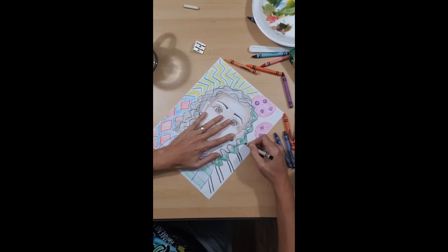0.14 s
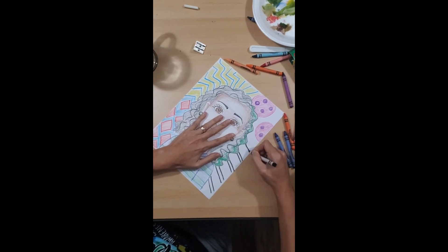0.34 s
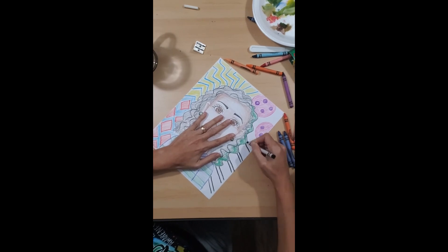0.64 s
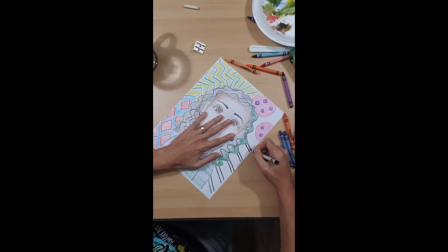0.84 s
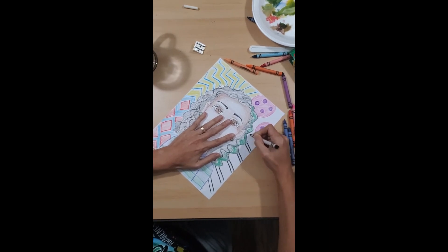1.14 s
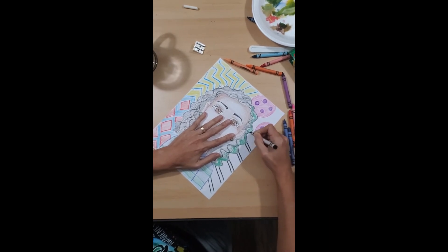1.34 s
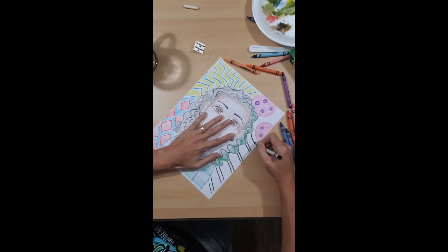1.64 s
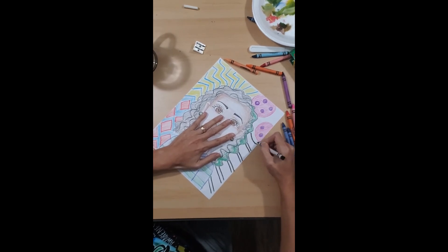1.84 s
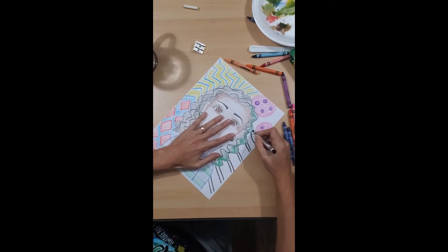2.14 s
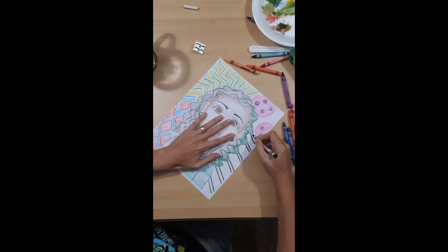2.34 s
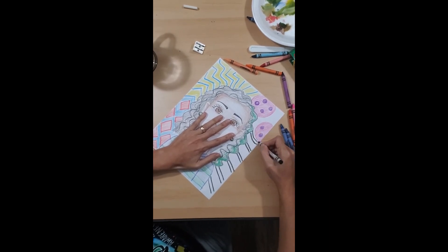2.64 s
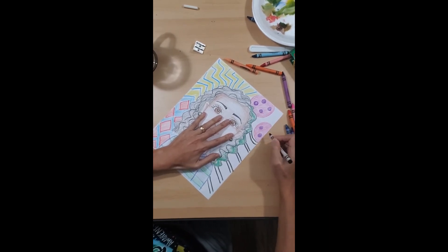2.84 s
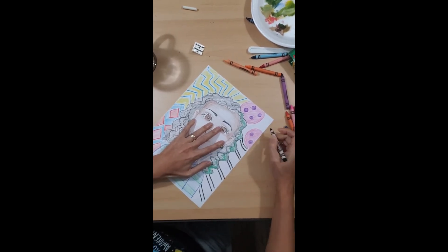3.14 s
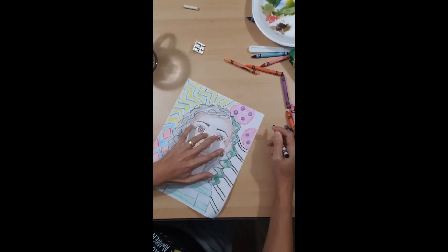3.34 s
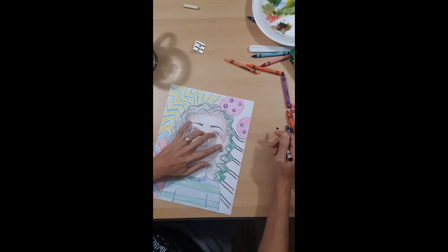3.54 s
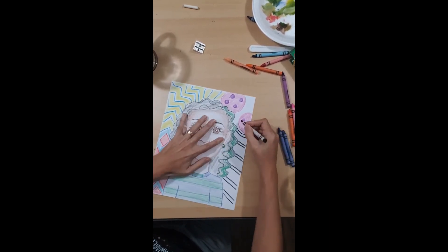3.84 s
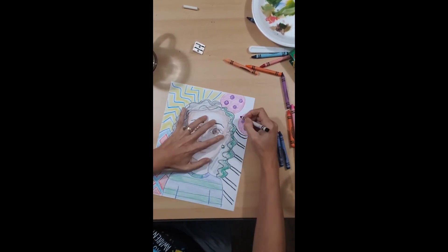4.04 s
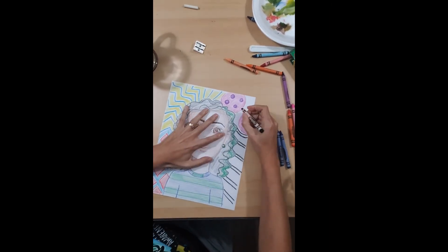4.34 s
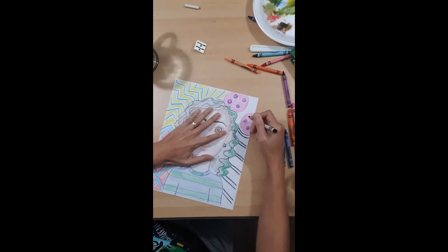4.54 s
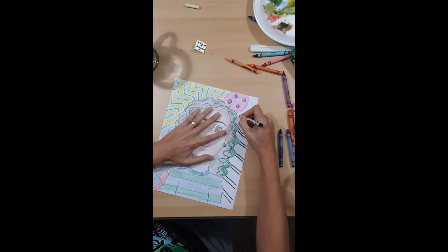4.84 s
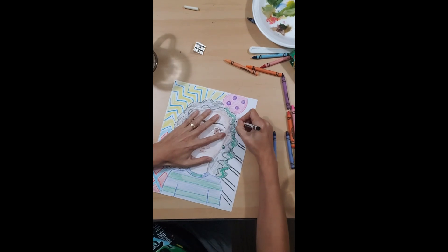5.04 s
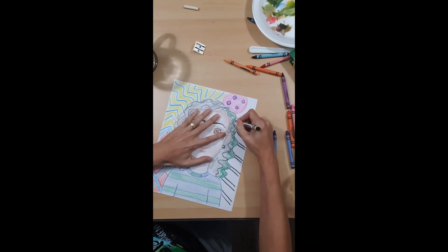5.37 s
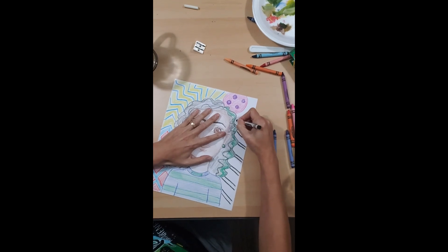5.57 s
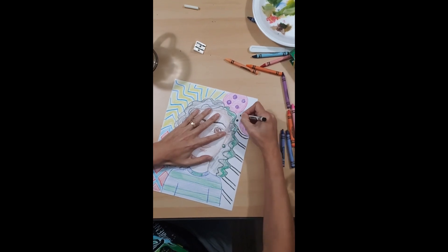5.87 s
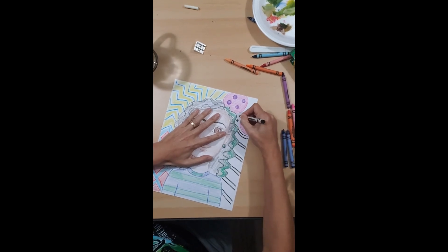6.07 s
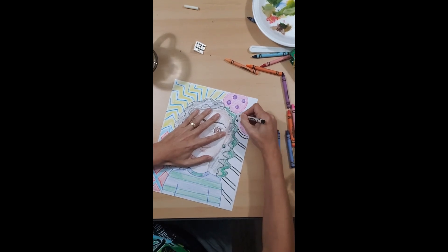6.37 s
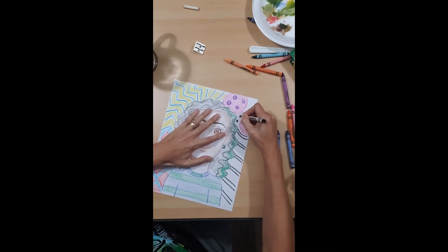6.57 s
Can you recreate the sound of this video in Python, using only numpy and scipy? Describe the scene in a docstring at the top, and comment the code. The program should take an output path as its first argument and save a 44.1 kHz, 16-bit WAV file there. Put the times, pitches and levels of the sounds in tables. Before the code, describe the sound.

A wax crayon scuffs and ticks on paper over a wooden table, the sheet swishing and a hand thumping, above a low steady hum.

```python
"""In a small quiet room with a low hum, someone colours with a wax crayon on paper at a wooden table.
The crayon rubs and scuffs as shaped grainy noise; hands and sheet slide as a hiss that darkens in each swish.
Knocks and hand thumps ring the decaying modes of the table top; crayons click as a crack with a brief ring.
One judder is a train of uneven noise bursts. Tones and shaped noise make the hum, rumble and air."""
import sys
import numpy as np
from scipy import signal
from scipy.fft import rfft, irfft, next_fast_len
from scipy.io import wavfile
from scipy.ndimage import map_coordinates

SR = 44100
rng = np.random.default_rng(int(sys.argv[2]) if len(sys.argv) > 2 else 0)


def generate_wav(signal):
    """Clip the signal to [-1, 1] and save it as 16-bit WAV at the path in sys.argv[1]."""
    frames = np.transpose(np.atleast_2d(signal))
    scaled = np.clip(frames, -1, 1) * 32767
    pcm = np.round(scaled).astype(np.int16)
    wavfile.write(sys.argv[1], SR, pcm)


N = 295591  # length in samples

# Faint unsteady tones beside the hum. Each row: pitch in Hz, mean level in dB.
WHINE_TONES = [(209.9, -81), (710.6, -87), (823.6, -87)]
# A second hum tone swells, rising a little. Each row: time in seconds, pitch in Hz, level in dB.
HUM_SWELL = [(1.1, 104.2, -85), (1.6, 106, -66), (2.4, 107, -59.5), (2.9, 109.7, -58), (3.3, 113.6, -84.5)]
# Spectrum of the room's rumble. Each row: frequency in Hz, relative density in dB per Hz.
RUMBLE_SPECTRUM = [(20, -31), (45, -9), (75, -7.5), (122, 3.5), (150, -1), (190, -5), (250, -15),
                   (350, -25.5), (700, -63)]
# Spectrum of the still room's air. Each row: frequency in Hz, relative density in dB per Hz.
AIR_SPECTRUM = [(150, -26), (280, -9.5), (380, -10.5), (560, -9.5), (820, -8.5), (1050, -16.5), (1300, -11),
                (2100, -18.5), (4100, -20), (5600, -13), (7000, -15), (9300, -22), (15700, -22.5)]
# Short gritty scuffs of crayon tip and sheet. Each row: start in seconds, level in dB, pitch in Hz,
# length in seconds.
SCUFFS = [(0.058, -61, 1400, 0.028), (1.883, -51.5, 1780, 0.031), (1.96, -39.5, 1900, 0.026),
          (2.09, -59, 2090, 0.018), (2.375, -54, 480, 0.053), (2.84, -54, 2800, 0.033),
          (3.022, -42.5, 8800, .035), (3.672, -37, 1900, 0.034), (3.787, -35.5, 2050, 0.046),
          (4.219, -50, 4280, 0.11), (5.645, -60, 1622, 0.052), (5.949, -61, 1400, 0.022)]
# The crayon drags over the paper. Each row: hardest pressure in seconds, relative level in dB,
# rise in seconds, fall in seconds.
CRAYON_DRAGS = [(.06, -61.5, .2, 0.051), (.705, -70, .03, .09), (1.042, -54.5, .06, 0.13),
                (1.471, -55.5, 0.12, 0.22), (1.658, -60.5, .03, .16), (2.39, -64.5, .22, 0.16),
                (2.89, -52.5, .055, 0.12), (3.43, -71.5, 0.13, .07), (3.6, -73, .2, .2),
                (3.76, -55.5, 0.067, 0.12), (3.97, -57.5, .025, 0.14), (4.11, -61.5, .04, 0.082),
                (5.69, -75, 0.051, .12), (5.95, -67, 0.24, 0.15)]
# Spectrum of wax on paper. Each row: frequency in Hz, relative density in dB per Hz.
GRIT_SPECTRUM = [(150, -17), (400, 4.5), (800, 2.5), (1700, -3.5), (3200, -12), (6000, -15), (15000, -26)]
# Hand or sheet slides. Each row: fastest moment in seconds, relative level in dB, rise in seconds,
# fall in seconds, lower edge of the hiss in Hz at the fastest moment.
HAND_SLIDES = [(.07, -70, 0.099, 0.14, 2460), (.36, -72, 0.087, .1, 4470), (.70, -68.5, 0.043, 0.086, 3500),
               (.85, -65, .13, .12, 4740), (1.075, -56.5, 0.085, .17, 4000),
               (1.38, -52.5, 0.13, 0.28, 3500), (1.69, -71.5, .1, .15, 2200), (2.32, -66.5, 0.29, .4, 4000),
               (2.90, -56.5, .14, .19, 1900), (3.18, -55.5, 0.17, 0.21, 2000),
               (3.422, -42, 0.073, 0.057, 2200), (3.519, -50, 0.031, 0.2, 2670),
               (3.75, -57.5, .1, .08, 3500), (3.98, -59.5, 0.096, 0.23, 2400),
               (4.10, -61.5, 0.13, 0.11, 3100), (4.53, -71.5, 0.052, .06, 2000),
               (4.705, -60.5, .045, 0.19, 6100), (5.21, -68, 0.19, 0.22, 4800),
               (5.42, -73.5, 0.078, 0.12, 4300), (5.604, -50.5, 0.051, .13, 2800),
               (5.83, -67, 0.16, 0.13, 3000), (5.98, -58.5, 0.15, 0.13, 2210)]
# Spectrum of the sliding hiss. Each row: frequency in Hz, relative density in dB per Hz.
HISS_SPECTRUM = [(600, -14.5), (1300, 2), (2000, -5), (3200, -3), (4500, -1.5), (6500, -0.5), (8500, -2),
                 (12000, -2), (15000, -10), (15800, -11)]
# The crayon tip strikes the table top. Each row: start in seconds, level in dB ahead of the bass shaping, #
# upper edge of the excited range in Hz (softer contact is lower).
TIP_KNOCKS = [(0.077, -57, 1230), (.194, -62, 1050), (.700, -67.5, 1460), (1.084, -52.5, 1180),
              (1.954, -51, 2400), (2.513, -63.5, 1000), (2.890, -53, 1080), (3.0238, -31.5, 5200),
              (3.032, -35, 560), (3.130, -53.5, 1400), (3.786, -44, 1200), (4.187, -33.5, 2420),
              (6.017, -62, 900)]
# The side of the hand lands with its weight and heaves the whole top. Each row: start in seconds, # level in dB
# ahead of the bass shaping, lower and upper edge of the excited range in Hz.
HAND_THUMPS = [(3.025, -38, 143, 170), (4.188, -38.5, 145, 171), (4.241, -29.5, 196, 800),
               (4.253, -23.5, 202, 620), (4.268, -31.5, 90, 113), (4.281, -32.5, 210, 1200)]
# Single modes of the table top. Each row: pitch in Hz, relative level in dB, 60 dB decay in seconds.
TABLE_MODES = [(114.27, 0.5, 0.44), (153, 5.5, 0.14), (212.5, -4.5, .3), (230, 2, 0.17), (274.2, -8, 0.36),
               (408.8, 2, 0.11), (425, -7.5, .25), (473, 0, 0.07), (553, -8, 0.28), (660, -1.5, 0.073),
               (702.4, -4.5, 0.34), (798, 2, 0.13), (830.4, 0, 0.12), (911, -12.5, 0.17), (1030, -33, 0.12),
               (1067, -21.5, 0.14), (1227, 3, 0.19), (1350, -10, 0.24), (1404, -3.5, 0.31),
               (1520, -14.5, 0.2), (1724, -1, 0.15), (1810, -1, 0.23), (2400, -6, 0.11), (4714, 4, .08)]
# The top's dense modes, heard as a thud. Each row: frequency in Hz, relative density in dB per Hz.
WOOD_SPECTRUM = [(80, -15), (200, 7), (420, 0), (800, -0.5), (1400, -1), (2000, -3), (4500, -4),
                 (7000, -14), (9500, -19), (12000, -2), (15000, -34.5)]
# How the knocks' bass is heard, with a steep low cut and a deep dip near 305 Hz. Each row: frequency in Hz,
# gain in dB.
KNOCK_BASS_SHAPE = [(30, -24), (70, -9), (105, 4.5), (275, -3), (305, -19), (350, -7), (390, 1.5)]
# Hard little contacts of crayons and nails. Each row: start in seconds, level in dB, pitch in Hz,
# ring over crack in dB, flight of the first bounce in seconds (0.004 or less: no bounce).
CLICKS = [(1.0434, -48, 1370, 23, 0), (1.0846, -35.5, 4550, -0.5, 0.016), (1.661, -58, 1380, 10, 0),
          (1.877, -53.5, 4186, -9, 0.0014), (1.9208, -48.5, 3300, -9, 0.0096),
          (1.953, -35.5, 2200, -9.5, .014), (2.843, -58, 2602, -11, 0.00027), (2.8868, -43, 2399, 12, 0),
          (3.0238, -36, 2300, -9, 0.000087), (3.680, -45, 2700, -18, 0.0005),
          (3.764, -46, 5140, 4, 0.00046), (3.784, -32, 3420, -9, 0.018), (5.895, -61, 1780, 4, 0.0008)]
# Spectrum of a hard contact. Each row: frequency in Hz, relative density in dB per Hz.
CRACK_SPECTRUM = [(150, -46), (500, 4.5), (1000, -6), (1700, -4), (3500, -5), (8000, -1), (12500, -0.5),
                  (15000, -8)]
# Spectrum of skin stuttering on the sheet. Each row: frequency in Hz, relative density in dB per Hz.
SKIN_SPECTRUM = [(70, -22), (130, -3), (200, 4), (275, 4.5), (400, -9.5), (600, -13), (800, -6),
                 (1200, -19.5), (3000, -27), (8000, -45)]
# How alike left and right are. Each row: frequency in Hz, likeness from 0 to 1.
STEREO_LIKENESS = [(30, 0.74), (60, .94), (150, 0.75), (300, 0.58), (650, 0.83), (1400, .12), (3000, .02)]
# Decay of the room's longer tail. Each row: frequency in Hz, 60 dB decay in seconds.
ROOM_DECAY = [(120, 0.71), (400, 0.4), (1000, 0.46), (3000, 0.43), (7000, 0.29), (14000, 0.22)]

HUM_HZ, HUM_DB, HUM_WAVER_DB = 102, -63.5, 3.5  # the core of the hum
DRONE_HZ, DRONE_Q, DRONE_DB = 106.3, 5.2, -64  # a narrow noise band around it makes it beat unevenly
# a stroke is this far down after its rise or fall time; the bends set how round its top is
STROKE_DROP_DB, RISE_BEND, FALL_BEND = 22, 1.44, 1.12
# the hiss edge glides from this far above its middle to this far below as the gap under the hand changes
DARKEN_OCTAVES = 0.83
TIP_LOW_HZ = 355  # so small a contact hardly reaches the modes below this
FLIGHT_SHRINK, BOUNCE_LOSS_DB = .85, 5  # each flight over the one before; loss a bounce
JUDDER_S, JUDDER_DB, JUDDER_ATTACK_S, JUDDER_HOLD_S = 1.432, -43.5, 0.00826, 0.11
JUDDER_SAG_DB_PER_S, JUDDER_RELEASE_DB_PER_S = 27, 190  # the release adds to the sag after the hold
TOP_HZ = 15800  # band limit of the output


def amp(db):
    """Decibels to gain."""
    return 10 ** (np.asarray(db) / 20)


def unit(x):
    """Scaled to rms 1."""
    return x / np.sqrt(np.mean(x ** 2) + 1e-20)


def along(points, hz):
    """(Hz, value) points read on a log axis."""
    f, v = np.transpose(points)
    return np.interp(np.log(hz + 1), np.log(f + 1), v)


def wobble(rate):
    """A smooth random curve, rate knots a second."""
    knots = rng.standard_normal(int(N * rate / SR) + 4)
    return map_coordinates(knots, [np.arange(N) * rate / SR])


def filtered(x, response):
    """x shaped by a response over frequency."""
    n = x.shape[-1]
    m = next_fast_len(n + 8192)  # spare room for the filter's ringing
    return irfft(rfft(x, m) * response(np.fft.rfftfreq(m, 1 / SR)), m)[..., :n]


def colour(x, spectrum):
    """x shaped by the given spectrum, at rms 1."""
    return unit(filtered(x, lambda hz: amp(along(spectrum, hz))))


def resonance(f, hz, q):
    """Response of one resonance."""
    return 1 / (1 + 1j * q * (f / hz - hz / (f + 1)))


def diffuse(pair):
    """Two unrelated signals as two close microphones hear them: alike mostly in the lower range."""
    turn = lambda hz: np.arccos(np.clip(along(STEREO_LIKENESS, hz), -1, 1)) / 2
    mid, side = filtered(pair, lambda hz: np.array([np.cos(turn(hz)), np.sin(turn(hz))]))
    return np.array([mid + side, mid - side])


def noise(size):
    """Stereo white noise."""
    return diffuse(rng.standard_normal((2, size)))


def contact(size):
    """Noise from one small spot: a good part reaches both microphones alike."""
    return noise(size) + 0.73 * rng.standard_normal(size)


def pan(db):
    """Left and right gains, db louder on the left."""
    return amp([[db / 2], [-db / 2]])


def add(track, s, db, hit):
    """Lay a hit into the track with the energy of 10 ms at the given level."""
    part = track[:, round(s * SR):][:, :hit.shape[1]]
    levelled = amp(db) * unit(hit) * np.sqrt(.01 * SR / hit.shape[1])
    part += levelled[:, :part.shape[1]]


def hum():
    """A low tone beats against a narrow drone and, for a while, against a second tone."""
    t = np.arange(N) / SR
    core_gain = amp(HUM_DB + HUM_WAVER_DB * wobble(8))
    core = core_gain * np.sin(2 * np.pi * HUM_HZ * t + .4 * wobble(4.5))
    s, hz, db = np.transpose(HUM_SWELL)
    swell_phase = 2 * np.pi * np.cumsum(np.interp(t, s, hz)) / SR
    swell = amp(np.interp(t, s, db)) * np.sin(swell_phase)
    drone = unit(filtered(rng.standard_normal(N), lambda f: resonance(f, DRONE_HZ, q=DRONE_Q) ** 2))
    return np.sqrt(2) * (core + swell) + amp(DRONE_DB) * drone  # root 2 makes the tone levels rms


def whine():
    """Faint tones that waver in level and pitch."""
    t = np.arange(N) / SR
    tones = 0
    for hz, db in WHINE_TONES:
        gain = amp(db + 2 * wobble(5))
        tones = tones + gain * np.sin(2 * np.pi * hz * t + wobble(9))
    return np.sqrt(2) * tones


def background():
    """A low wavering hum and faint tones over the rumble and hiss of the room."""
    rumble = amp(-67.0) * colour(noise(N), RUMBLE_SPECTRUM)
    air = amp(-73.0) * colour(noise(N), AIR_SPECTRUM)
    return (hum() + rumble + whine()) * pan(db=2.5) + air * pan(db=4.0)


def scuffs():
    """Wax tears across the paper's tooth: a quick swell of tiny cracks."""
    out, t = np.zeros((2, N)), np.arange(SR // 5) / SR
    tooth = noise(N) * amp(1.2 * wobble(600))
    for s, db, hz, length in SCUFFS:
        cracks = tooth[:, round(s * SR):][:, :len(t)]
        swell = (t / length) ** 0.21 * np.exp(-(t / length) ** 2.7)
        add(out, s, db, swell * filtered(cracks, lambda f: resonance(f, hz, q=0.6) ** 2))
    return out


def stroke_shape(t, rise, fall):
    """Gain of one movement of the hand, t seconds from its peak: it speeds up, then dies away."""
    before = (np.maximum(-t, 0) / rise) ** RISE_BEND
    after = (np.maximum(t, 0) / fall) ** FALL_BEND
    return amp(-STROKE_DROP_DB * (before + after))


def friction(spectrum, rough_db, catch_rate):
    """Paper fibres catch and let go: noise in tiny uneven bursts."""
    return colour(noise(N) * amp(rough_db * wobble(catch_rate)), spectrum)


def strokes():
    """Smooth sliding of skin and sheet, each swish darkening as it goes, and the coarser drag of wax."""
    hiss = friction(HISS_SPECTRUM, rough_db=1.0, catch_rate=400)
    hz, t, z = signal.stft(hiss, SR, nperseg=256)
    power = np.zeros((len(hz), len(t)))
    for s, db, rise, fall, edge_hz in HAND_SLIDES:
        edge = edge_hz * 2 ** (-DARKEN_OCTAVES * np.tanh(2.5 * (t - s) / (rise + fall)))
        high_pass = 1 / (1 + (edge / (hz[:, None] + 1)) ** 8)
        power += (amp(db) * stroke_shape(t - s, rise, fall)) ** 2 * high_pass
    slide = signal.istft(z * np.sqrt(power), SR, nperseg=256)[1][:, :N] * amp(2.5)
    pressure = sum(amp(db) * stroke_shape(t - s, rise, fall) for s, db, rise, fall in CRAYON_DRAGS)
    grit = friction(GRIT_SPECTRUM, rough_db=1.5, catch_rate=170)
    return slide + np.interp(np.arange(N) / SR, t, pressure) * grit


def knocks():
    """Each blow rings the table top; the contact decides which range of modes it reaches."""
    out, t = np.zeros((2, N)), np.arange(SR // 3) / SR
    hz, mode_db, t60 = np.transpose(TABLE_MODES)[:, :, None]
    modes = amp(mode_db - 60 * t / t60) * np.exp(2j * np.pi * hz * t)
    thud_fade = amp(-60 * t / 0.053) + 1.9 * amp(-60 * t / 0.036)
    tip_blows = [(s, db, TIP_LOW_HZ, top) for s, db, top in TIP_KNOCKS]
    for s, db, low_hz, high_hz in tip_blows + HAND_THUMPS:
        reach = lambda f: 1 / np.sqrt((1 + (f / high_hz) ** 4) * (1 + (low_hz / (f + 1)) ** 12))
        phase = rng.standard_normal(hz.shape) * hz / 800  # short waves depend more on the spot struck
        strength = amp(rng.standard_normal(hz.shape)) * reach(hz) * np.exp(1j * phase)
        ring = (strength * modes).imag.sum(0)
        thud = filtered(colour(contact(len(t)), WOOD_SPECTRUM), reach) * thud_fade
        onset = 1 - np.exp(-t * high_hz)  # softer contact starts slower
        add(out, s, db, (ring + amp(14.5) * thud) * onset)
    return filtered(out, lambda f: amp(along(KNOCK_BASS_SHAPE, f)))


def clicks():
    """A sharp crack, duller at lower pitch, and a small wax stick's brief ring; some bounce ever faster."""
    out, t = np.zeros((2, N)), np.arange(SR // 10) / SR
    crack_fade, ring_fade = amp(-60 * t / .009), amp(-60 * t / .017)
    onset = 1 - np.exp(-t / .0004)
    for s, db, hz, ring_db, flight in CLICKS:
        for k in range(3 if flight > .004 else 1):  # first contact, then up to two bounces
            dull = lambda f: 1 / np.hypot(1, (f / (2.2 * hz)) ** 3.8)
            crack = filtered(colour(contact(len(t)), CRACK_SPECTRUM), dull)
            ring = filtered(contact(len(t)), lambda f: resonance(f, hz, q=4.6))
            delay = flight * np.sum(FLIGHT_SHRINK ** np.arange(k))
            hit = unit(crack * crack_fade) + amp(ring_db) * unit(ring * ring_fade)
            add(out, s + delay, db - BOUNCE_LOSS_DB * k, onset * hit)
    return out


def judder():
    """A hand sticks and slips on the sheet at an uneven rate, drumming softly on the table."""
    t = np.maximum(np.arange(N) / SR - JUDDER_S, 0)
    fade_db = JUDDER_SAG_DB_PER_S * t + JUDDER_RELEASE_DB_PER_S * np.maximum(t - JUDDER_HOLD_S, 0)
    cycle = np.cumsum(115 * np.exp(.3 * wobble(70))) / SR % 1  # around 115 slips a second
    slips = np.exp(-cycle / .45)
    envelope = np.minimum(t / JUDDER_ATTACK_S, 1) * amp(JUDDER_DB - fade_db)
    return envelope * colour(contact(N) * slips, SKIN_SPECTRUM)


def room(x):
    """The walls answer a few milliseconds later, the treble dying first."""
    hz, t, z = signal.stft(noise(SR * 2 // 3), SR, nperseg=256)
    decay = amp(-60 * t / along(ROOM_DECAY, hz)[:, None]) + 1.6 * amp(-60 * t / 0.086)
    build_up = 1 - np.exp(-t / 0.0049)
    tail = signal.istft(z * decay * build_up, SR, nperseg=256)[1]
    return signal.fftconvolve(x, tail / np.linalg.norm(tail[0]), axes=1)[:, :N]


def scene():
    """Everything on the table, a little to the left; the table's bass arrives almost wholly direct."""
    wood, wax = knocks(), clicks() + scuffs()
    sliding = strokes() + judder()
    direct = wood * pan(db=1.5) + wax * pan(db=3.0) + sliding * pan(db=2.0)
    send = amp(-1.5) * wood + amp(-0.5) * wax + amp(-7.0) * sliding
    spread = filtered(send, lambda f: f / np.hypot(f, 450))  # thins the bass sent to the room
    return direct + room(spread) * pan(db=1.3) + background()


def record(dry):
    """Nothing is kept above the band limit."""
    return filtered(dry, lambda hz: hz < TOP_HZ)


dry = scene()
out = record(dry)
generate_wav(out)
```